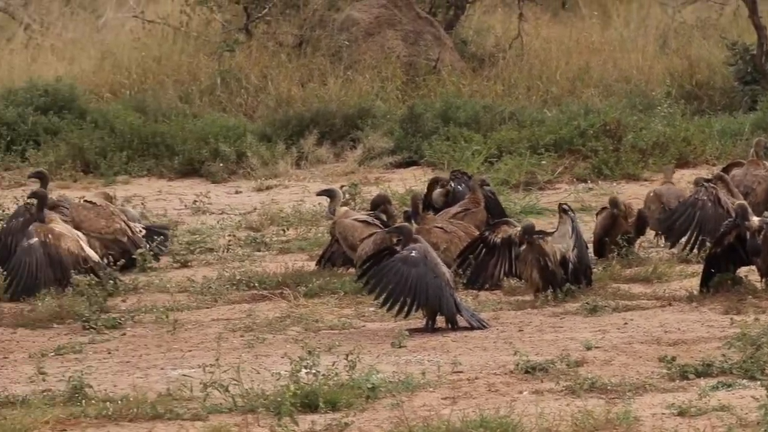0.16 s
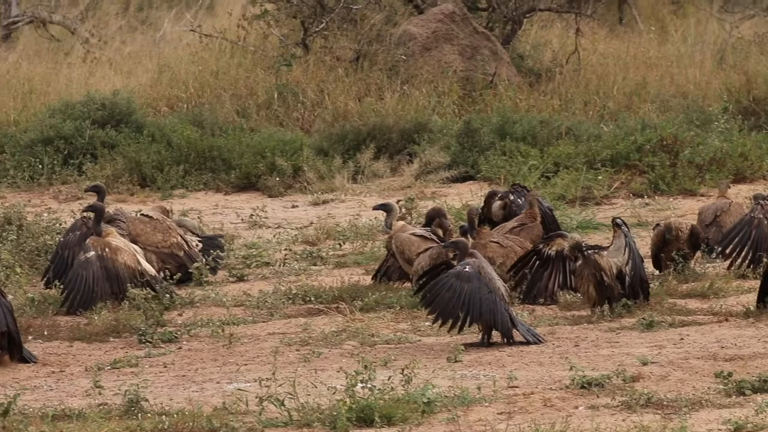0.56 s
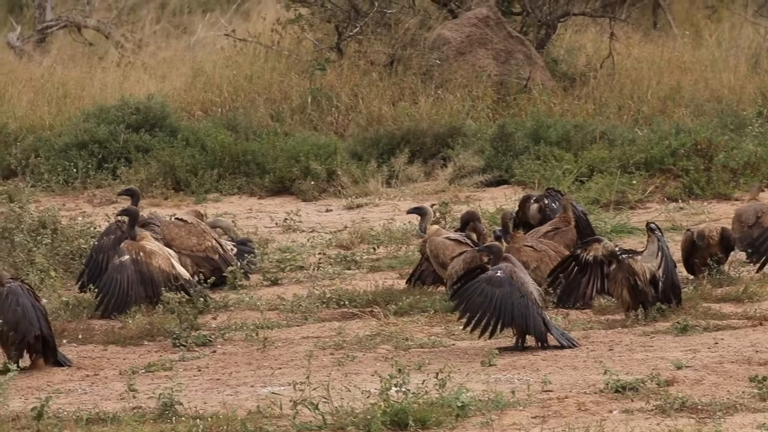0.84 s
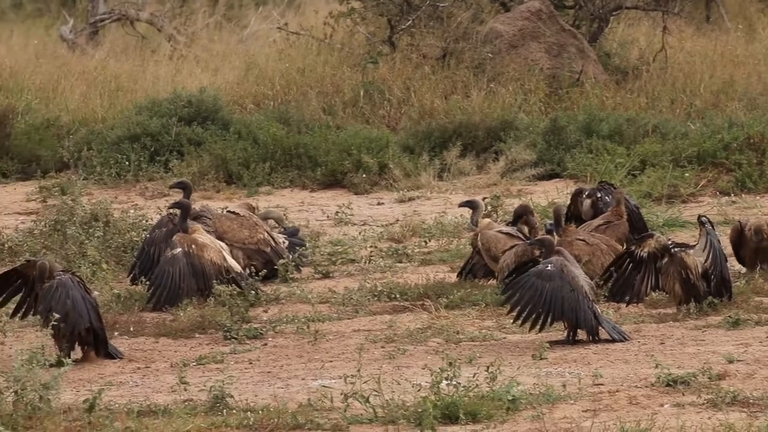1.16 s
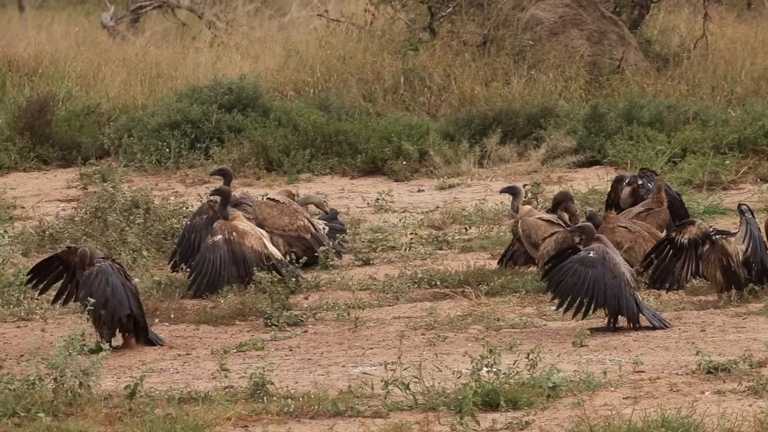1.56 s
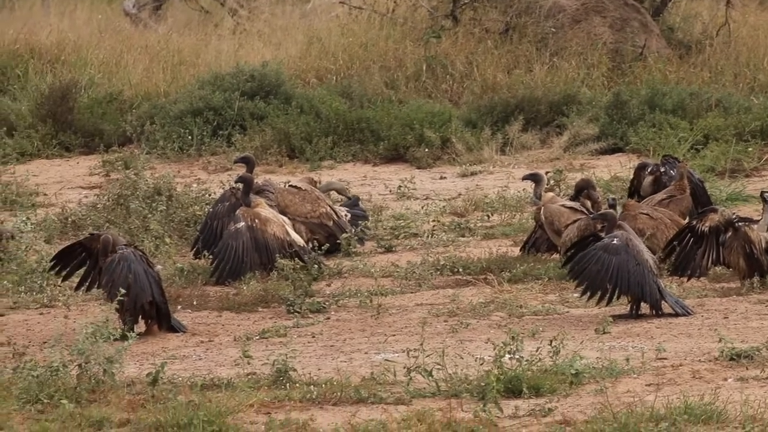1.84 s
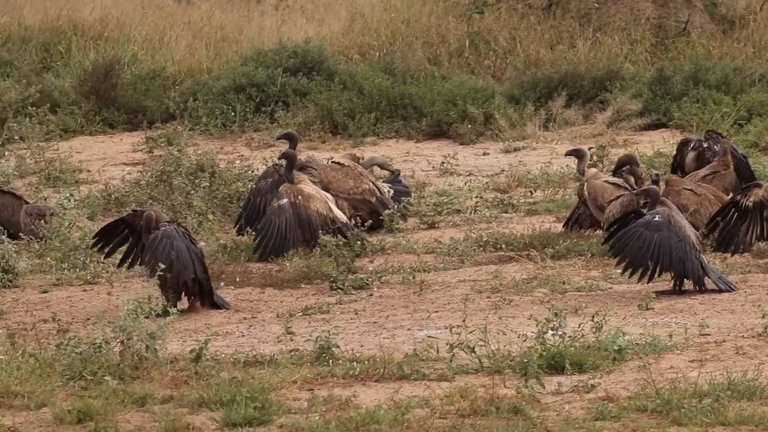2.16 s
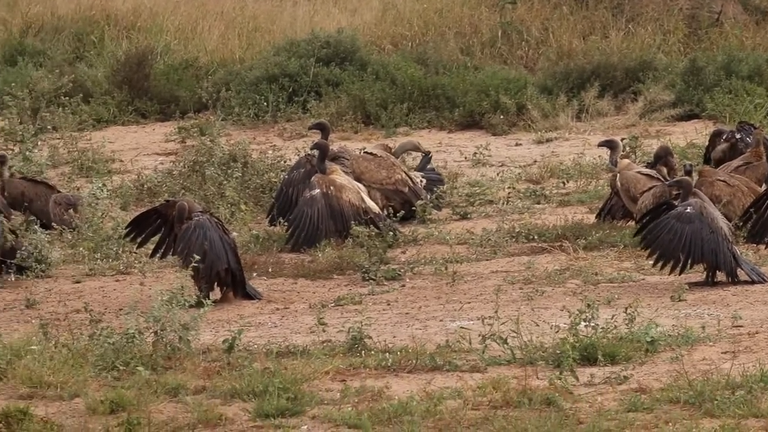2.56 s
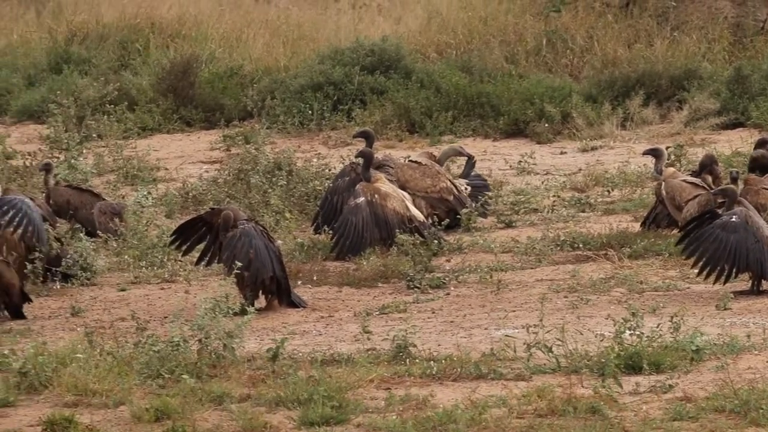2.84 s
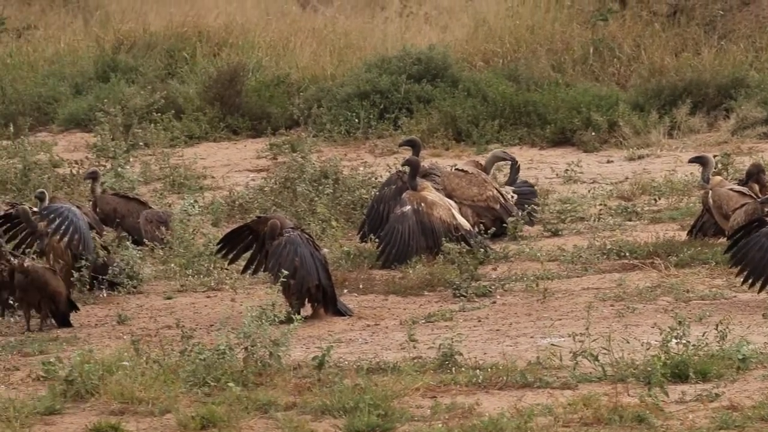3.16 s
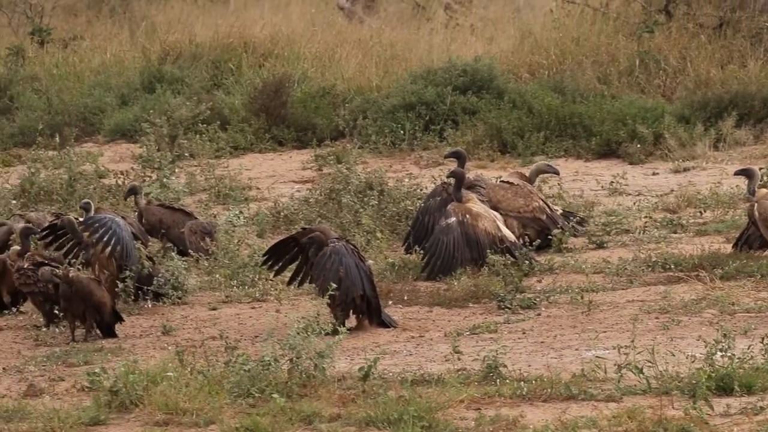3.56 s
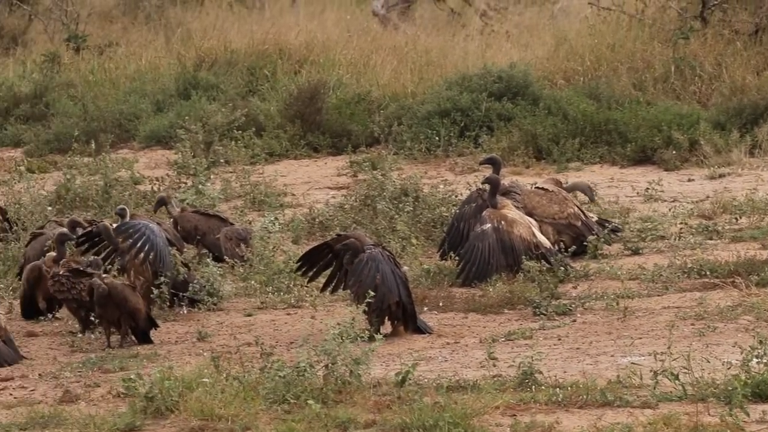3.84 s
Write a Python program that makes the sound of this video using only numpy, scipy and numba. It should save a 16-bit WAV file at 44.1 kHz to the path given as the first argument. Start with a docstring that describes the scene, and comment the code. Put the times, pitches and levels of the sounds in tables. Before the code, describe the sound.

Vultures hiss and rasp breathily on open ground, swelling loudest in the second half.

```python
"""Hissing vultures on open sandy ground

Vultures hiss and rasp a stone's throw away, heard by the two small ports of a hand-held camera.
Breath noise rings two throat resonances and one of the beak; thin whistles and a short squawk sound among
the hisses. Wind buffets the left port, then the right; the camera body clicks once by the left port.
A fly buzzes faintly, soft low thumps and ticks are heard, and a short rising croak comes near the end.
A low drone and soft hiss lie under it all."""
import sys
import numpy as np
from scipy import signal
from scipy.fft import rfft, irfft
from scipy.io import wavfile
from scipy.ndimage import uniform_filter1d
from numba import njit

SR = 44100
rng = np.random.default_rng(int(sys.argv[2]) if len(sys.argv) > 2 else 0)


def to_wav(s):
    """Save 16-bit WAV."""
    ch = np.atleast_2d(s).T  # columns
    pcm = np.round(np.clip(ch, -1, 1) * 32767)  # PCM
    wavfile.write(sys.argv[1], SR, pcm.astype(np.int16))


N = 176400  # samples, 4 s


def undb(db):
    """Decibel law: the amplitude gain of a level in dB."""
    return 10 ** (np.asarray(db) / 20)


def level(x, db):
    """Mean power: scale x to an rms level in dB."""
    return x * undb(db) / np.sqrt(np.mean(x ** 2))


def over_hz(table):
    """Logarithmic frequency scale: spread a (frequency [Hz], value) table over the FFT bins."""
    hz, value = np.array(table, float).T
    bins_hz = np.arange(N // 2 + 1) * SR / N
    return np.interp(np.log(bins_hz + 1), np.log(hz), value)


def coloured(table, x):
    """Spectral shaping: weight x by a table of levels, with nothing beyond its end frequencies."""
    hz = np.arange(N // 2 + 1) * SR / N
    inside = (hz > table[0][0]) * (hz < table[-1][0])
    return irfft(rfft(x) * undb(over_hz(table)) * inside, N)


@njit
def svf(x, hz, width):
    """Driven resonance: a state-variable band-pass whose centre may move, with unit gain at its peak."""
    y, band, low = np.empty(len(x)), 0., 0.
    for i in range(len(x)):
        g, damping = np.tan(np.pi * hz[i] / SR), width / hz[i]
        v = (band + g * (x[i] - low)) / (1 + g * (g + damping))
        band, low = 2 * v - band, low + 2 * g * v
        y[i] = damping * v
    return y


def ring(x, hz, width):
    """Cascaded resonance: two band-passes in series, the second 2.03 times as wide, set to rms 1."""
    return level(svf(svf(x, hz, 1. * width), hz, 2.03 * width), 0)


def walk(rate_hz):
    """Random modulation: levels drawn at about rate_hz and smoothed twice, with spread 1."""
    k = int(SR / rate_hz)
    held = np.repeat(rng.standard_normal(N // k + 1), k)
    w = uniform_filter1d(uniform_filter1d(held, k), k)[:N]
    return w / w.std()


def fade(t, s, length, edge):
    """Trapezoidal envelope: ramp in, hold, ramp out."""
    return np.clip(np.minimum(t - s, s + length - t) / edge, 0, 1)


def panned(x, pan_db):
    """Level difference between ports: weaken the far side; positive pan_db favours the left."""
    return x * undb([[min(pan_db, 0)], [min(-pan_db, 0)]])


# spectrum of the low drone: (frequency [Hz], relative level [dB])
DRONE_SPECTRUM = [(15, -23), (25, -10.5), (49, -5.5), (98, -7.5), (182, -3), (224, -8.5), (285, -1),
                  (375, -7.5), (426, 1.5), (484, -6.5), (646, -6), (689, -10), (783, -9), (876, -12),
                  (1150, -13.5), (1500, -38), (2530, -120)]
# slow rise and fall of the drone: (time [s], gain [dB])
DRONE_SWELL = [(0, -1), (.5, 1), (1.0, -1.1), (1.5, -1), (2.0, -0.8), (2.5, 2), (3.0, -0.2), (3.5, 1.5),
               (4, 0)]
DRONE_DB, DRONE_PAN_DB = -63, 2.5  # rms before swell and pan; left minus right
DRONE_ALIKE = 0.69  # share of power common to both ports


def drone(t):
    """Partial coherence: shaped noise common to both ports mixed with noise independent at each."""
    common, left, right = (coloured(DRONE_SPECTRUM, undb(0.82 * walk(4.37)) * rng.standard_normal(N))
                           for _ in range(3))
    both = np.sqrt(DRONE_ALIKE) * common + np.sqrt(1 - DRONE_ALIKE) * np.array([left, right])
    swell = undb(np.interp(t, *np.array(DRONE_SWELL).T))
    return level(both, DRONE_DB) * swell * undb([[DRONE_PAN_DB / 2], [-DRONE_PAN_DB / 2]])


# spectrum of the microphone hiss: (frequency [Hz], relative level [dB])
MICROPHONE_SPECTRUM = [(530, -38), (900, -12), (968, -3.5), (1840, -9.5), (2620, -25), (2720, -10.5),
                       (4320, -16), (8750, -14), (13900, -18), (16500, -38)]


def microphone_hiss():
    """Incoherent self-noise: shaped noise drawn separately for each port."""
    return level(coloured(MICROPHONE_SPECTRUM, rng.standard_normal((2, N))), -68)


FLY_START_S, FLY_END_S, FLY_HZ, FLY_DB = 0.98, 1.87, 182, -73  # mean pitch, peak level before flutter


def fly(t):
    """Frequency and amplitude modulation: a faint sine wanders in pitch and level, nearer the right port."""
    env = fade(t, FLY_START_S, FLY_END_S - FLY_START_S, 0.088) * undb(4 * walk(12))
    phase = 2 * np.pi * np.cumsum(FLY_HZ * (1 + 0.06 * walk(9))) / SR
    return panned(undb(FLY_DB) * env * np.sin(phase), -1)


# wind puffs on a port: (time [s], push before filtering [dB], length [s], left minus right [dB])
PUFFS = [(2.29, -47.5, 0.021, 16), (2.319, -57, .02, 14), (2.338, -51, .02, 14), (2.368, -47, 0.02, 10),
         (2.38, -29, 0.016, -43), (2.403, -34.5, 0.015, -40), (2.421, -31, 0.014, -36),
         (2.443, -34.5, 0.0063, -40), (2.452, -36, 0.012, -40), (2.461, -50, 0.024, -40)]
PUFF_RISE_S, PUFF_SAG, PUFF_LEAK_DB = 0.0011, 0.34, -26


def wind(t):
    """Pressure pulse: a puff pushes the membrane fast and it swings back; the other port feels it reversed."""
    out = 0
    for s, db, length, pan_db in PUFFS:
        u = np.clip((t - s) / length, 0, 1)
        rise = np.exp(-((t - s) / PUFF_RISE_S) ** 2)
        swing = np.cos(3 * np.pi / 2 * u ** 0.83) * (1 - PUFF_SAG * u)
        out = out + panned(undb(db) * np.where(t < s, rise, swing), pan_db)
    out = signal.sosfilt(signal.butter(1, [12, 400], "band", fs=SR, output="sos"), out)
    return out - undb(PUFF_LEAK_DB) * out[::-1]


# soft low thumps, then a short rising croak in the last two rows:
# (time [s], envelope peak [dB], frequency [Hz], frequency rise [Hz/s], left minus right [dB])
THUMPS_AND_CROAK = [(.06, -61, 50, 0, -16), (.705, -56, 180, 0, -2), (3.041, -57, 160, 0, 2),
                    (3.142, -58, 175, 0, -1), (3.939, -55, 646, 0, 2), (3.944, -56, 770, 4000, 2)]
BURST_CYCLES = 4.5


def thumps_and_croak(t):
    """Tone burst: a few cycles of a sine, steady or rising, under a Gaussian bump."""
    out = 0
    for s, db, hz, rise, pan_db in THUMPS_AND_CROAK:
        spread_s = min(BURST_CYCLES / hz / 2 + 0.0038, .03)
        bump = np.exp(-((t - s) / spread_s) ** 2)
        phase = 2 * np.pi * (hz + rise * (t - s) / 2) * (t - s)
        out = out + panned(undb(db) * bump * np.sin(phase), pan_db)
    return out


# modes of the tapped camera body: (frequency [Hz], relative level [dB], 60 dB decay time [s])
CLICK_MODES = [(400, -26.5, 0.043), (1200, -3, 0.0045), (3800, -2, 0.0025), (5700, 2, 0.0014),
               (7600, 3.5, 0.0013), (9840, -1, 0.0022), (12100, 0, .0016), (15100, -2, .0014)]
CLICK_S, CLICK_RISE_S, CLICK_DB = 2.57633, .00003, -10  # peak level at the left port


def click(t):
    """Modal decay: a sharp tap rings the camera body; the right port hears it thin and late."""
    u = np.maximum(t - CLICK_S, 0)
    x = sum(undb(db) * np.exp(-np.log(1000) * u / t60) * np.sin(2 * np.pi * hz * u)
            for hz, db, t60 in CLICK_MODES)
    x = x * (1 - np.exp(-u / CLICK_RISE_S))
    near = x * undb(CLICK_DB) / np.abs(x).max()
    far = svf(np.roll(near, shift=6), 8500 + 0 * t, 5500.0)  # 6 samples late
    return np.array([near, undb(-10) * far])


# ticks of beaks and grit: (time [s], envelope peak before filter and gain [dB])
TICKS = [(0.4758, -60), (0.581, -61), (0.7297, -57), (0.8405, -59), (1.3543, -61), (1.6546, -61),
         (2.1114, -62), (3.448, -57), (3.9482, -56)]
TICK_HZ, TICK_WIDTH_HZ, TICK_DECAY_S = 3830, 750, 0.0034


def ticks(t):
    """Impulsive excitation: short decaying noise bursts ring one resonance."""
    env = sum(undb(db) * (t > s) * np.exp(-np.abs(t - s) / TICK_DECAY_S) for s, db in TICKS)
    return 5.6 * svf(env * rng.standard_normal(N), TICK_HZ + 0 * t, 1. * TICK_WIDTH_HZ)


# thin whistles and a short squawk (at 1.80 s) among the hisses: (start [s], length [s],
# start frequency [Hz], end frequency [Hz], rms level before flutter [dB], octave relative to fundamental [dB])
WHISTLES_AND_SQUAWK = [(1.172, .105, 2390, 2290, -66, -26), (1.738, 0.033, 1420, 1380, -64, -14),
                       (1.801, 0.027, 1370, 1354, -57, 0), (1.852, .072, 2095, 2135, -68.5, -4),
                       (1.917, .066, 2135, 2120, -69, -8), (1.975, .058, 2490, 2600, -80, -24),
                       (2.026, 0.044, 2610, 2540, -75, -20), (2.062, 0.03, 2520, 2300, -67.5, -17),
                       (2.086, 0.055, 2130, 2120, -67, -20)]
WHISTLE_EDGE_S, WHISTLE_WAVER, WHISTLE_FLUTTER_DB = .008, .005, 2.2  # waver: fraction of pitch


def whistles_and_squawk(t):
    """Harmonic tone: a gliding, wavering sine with its octave, as strong as the fundamental in the squawk."""
    out = 0
    waver = 1 + WHISTLE_WAVER * walk(90)
    flutter = undb(WHISTLE_FLUTTER_DB * walk(70))
    for s, length, hz0, hz1, db, octave_db in WHISTLES_AND_SQUAWK:
        env = fade(t, s, length, WHISTLE_EDGE_S)
        phase = 2 * np.pi * np.cumsum(np.interp(t, [s, s + length], [hz0, hz1]) * waver) / SR
        tone = np.sin(phase) + undb(octave_db) * np.sin(2 * phase)
        out = out + undb(db) * env * flutter * tone
    return out * np.sqrt(2)  # rms to peak of a sine


# short rough rasps: (start [s], length [s], level before envelope [dB], centre [Hz], width [Hz])
RASPS = [(0.048, 0.079, -62, 1000, 604), (1.803, 0.034, -55, 2800, 3460), (1.884, 0.016, -64, 2300, 2000)]
RASP_RATE_HZ, RASP_DEPTH_DB, RASP_ATTACK_S = 300, 6, .003


def rasps(t):
    """Amplitude roughness: resonant noise with fast random level changes starts sharply, then sags."""
    rough = undb(RASP_DEPTH_DB * walk(RASP_RATE_HZ)) * rng.standard_normal(N)
    out = 0
    for s, length, db, hz, width in RASPS:
        attack = np.clip((t - s) / RASP_ATTACK_S, 0, 1)
        sag = np.clip((s + length - t) / length * 2.3, 0, 1)
        out = out + undb(db) * attack * sag * ring(rough, hz + 0 * t, width)
    return out


# half-whistled strands of breath:
# (start [s], length [s], start frequency [Hz], end frequency [Hz], level [dB])
STRANDS = [(0.026, 0.26, 1470, 1450, -55), (0.08, 0.2, 2180, 2110, -53.5), (1.8, 0.043, 2670, 3200, -59),
           (1.711, 0.064, 3000, 2850, -61), (1.704, 0.06, 2420, 2400, -58), (1.76, .08, 2230, 2300, -63),
           (2.13, 0.08, 4050, 3430, -63), (2.577, 0.136, 2370, 1566, -45), (2.671, 0.296, 1540, 1458, -50),
           (2.71, 0.1, 1980, 1830, -49.5), (2.6, 0.063, 1720, 1630, -46), (2.81, .035, 2230, 2330, -50),
           (2.99, 0.079, 1450, 1570, -53), (2.682, 0.052, 4820, 5070, -56), (3.55, 0.36, 2080, 2300, -62)]
STRAND_WIDTH_HZ, STRAND_EDGE_S = 128, 0.018


def strands(t):
    """Narrow-band noise: breath noise through one narrow gliding resonance."""
    breath = rng.standard_normal(N)
    out = 0
    for s, length, hz0, hz1, db in STRANDS:
        glide_hz = np.interp(t, [s, s + length], [hz0, hz1])
        env = fade(t, s, length, STRAND_EDGE_S)
        out = out + undb(db) * env * ring(breath, glide_hz, STRAND_WIDTH_HZ)
    return out


# one path of levels and resonances per hiss: (time [s], low throat level [dB], low throat [Hz],
# high throat level [dB], high throat [Hz], beak level [dB], beak [Hz], treble level [dB], top air level [dB])
HISSES = [
    [(0.0, -49, 1550, -54, 2340, -60, 3730, -69, -80), (0.036, -59, 1540, -54, 2200, -58.5, 3870, -66, -75),
     (0.086, -47, 1470, -48.5, 2020, -61, 3930, -62.5, -84),
     (0.122, -57, 1480, -50, 2160, -62, 4100, -59, -72),
     (0.204, -55, 1700, -47, 2110, -56.5, 3980, -58, -61),
     (0.324, -53, 1550, -52, 2270, -56.5, 3920, -64.5, -69),
     (0.392, -52.5, 1640, -50.5, 2220, -60, 3600, -61, -78),
     (0.458, -54.5, 1610, -55, 2170, -64.5, 3570, -75, -88),
     (0.564, -56, 1660, -55.5, 2130, -67.5, 3850, -69, -88),
     (0.62, -53, 1670, -57, 2040, -62, 3600, -67, -84)],
    [(0.62, -58, 1680, -61, 2110, -65, 3660, -68, -80),
     (0.682, -54.5, 1700, -58.5, 1960, -63, 3660, -76.5, -82),
     (1.046, -57, 1750, -57.5, 1920, -73, 3540, -74, -86),
     (1.086, -59.5, 1690, -66.5, 1950, -74, 3730, -80, -88),
     (1.236, -60, 1640, -62.5, 2200, -72.5, 3620, -72, -77),
     (1.368, -61, 1760, -66, 1940, -75.5, 3800, -84, -99),
     (1.584, -60, 1680, -64, 2370, -70.5, 3690, -78, -80),
     (1.624, -61, 1690, -69, 2080, -74, 3860, -84, -91),
     (1.638, -64, 1690, -57.5, 2130, -67.5, 3860, -73, -87),
     (1.69, -60, 1650, -64, 2070, -73, 3770, -82, -89)],
    [(1.69, -72, 1610, -78, 2310, -80, 3640, -87, -91), (1.702, -65, 1610, -72, 2360, -87, 3550, -89, -91),
     (1.726, -59, 1590, -52, 2430, -80, 3490, -67, -84), (1.756, -60, 1470, -58, 2420, -60, 3500, -68, -89),
     (1.788, -62, 1460, -66, 2270, -88, 3720, -78, -88), (1.818, -62, 1400, -53, 2540, -56, 3890, -76, -87),
     (1.858, -69, 1490, -82, 2420, -84, 4000, -88, -93), (1.886, -63, 1460, -63, 2100, -72, 4220, -88, -89),
     (1.904, -82, 1540, -67, 2120, -72, 4060, -84, -86), (2.0, -75, 1490, -74, 2200, -80, 3800, -89, -93)],
    [(2.1, -96, 1610, -86, 2100, -84, 3920, -88, -94), (2.156, -50, 1610, -52.5, 2020, -70, 3960, -67, -84),
     (2.174, -51, 1640, -60, 1950, -55.5, 3720, -64, -85),
     (2.226, -47, 1680, -46, 1990, -58, 3670, -64, -75),
     (2.288, -44, 1700, -48, 2070, -49, 3500, -57.5, -73),
     (2.352, -44, 1730, -45.5, 2150, -54, 3730, -61, -79),
     (2.386, -50.5, 1650, -56, 2030, -77, 3650, -64, -85),
     (2.416, -43, 1750, -48.5, 2010, -60, 3950, -59, -75),
     (2.526, -48, 1650, -50.5, 1940, -59, 3680, -58.5, -72),
     (2.56, -50, 1590, -51, 2210, -51, 3870, -57, -71)],
    [(2.59, -49, 1550, -42, 2270, -48.5, 3600, -62, -84),
     (2.628, -52, 1670, -44.5, 2100, -58, 3930, -58, -77),
     (2.664, -45, 1700, -50, 2120, -50, 3840, -64, -77),
     (2.756, -48, 1550, -48, 2210, -62.5, 3920, -64.5, -81),
     (2.808, -47, 1650, -51.5, 2330, -57, 3700, -67, -85),
     (2.888, -46, 1690, -47.5, 2220, -59.5, 3740, -62, -81),
     (3.08, -51, 1550, -46, 2170, -55, 4060, -61, -75),
     (3.162, -55.5, 1530, -49.5, 2280, -58, 3960, -67.5, -85),
     (3.322, -59, 1830, -61.5, 2030, -79, 3630, -73.5, -89),
     (3.35, -63, 1720, -59, 2150, -87, 3760, -88, -91)],
    [(3.35, -60, 1710, -64, 2050, -86, 3860, -86, -87),
     (3.406, -60, 1720, -59.5, 2100, -75, 4080, -68, -86),
     (3.432, -57, 1700, -63, 2210, -88, 3770, -82, -75),
     (3.442, -61, 1600, -62, 2200, -79, 3770, -64.5, -75),
     (3.49, -60, 1570, -52, 2180, -79, 3580, -66.5, -91),
     (3.518, -53, 1650, -57.5, 2170, -67, 3620, -59.5, -79),
     (3.652, -52, 1650, -49.5, 2320, -60.5, 3400, -60.5, -77),
     (3.756, -59, 1650, -53, 2280, -80, 3400, -70.5, -88),
     (3.942, -60.5, 1570, -56, 2240, -81, 3780, -69, -79), (4.0, -64, 1570, -69, 2190, -68, 3800, -78, -89)],
]
# spectrum of the treble breath: (frequency [Hz], relative level [dB])
TREBLE_SPECTRUM = [(2600, -52), (3800, -9), (4700, -11), (5500, -3.5), (6200, -4), (7200, -4.5), (8100, -4),
                   (8800, -33), (10000, -26), (12000, -53)]
LOW_WIDTH_HZ, HIGH_WIDTH_HZ, BEAK_WIDTH_HZ = 550, 605, 1010
THROAT_EDGE_HZ, AIR_HZ, AIR_WIDTH_HZ = 1328, 10400, 2200
FLUTTER_HZ, FLUTTER_DB, WOBBLE_HZ, WOBBLE_DB = 151.2, 1, 15, 0.96


def hisses(t):
    """Source and filter: fluttering breath noise excites moving throat and beak resonances, treble and air."""
    rows = np.vstack([np.array(h, float) for h in HISSES])
    paths = (np.interp(t, rows[:, 0], column) for column in rows.T[1:])
    low_db, low_hz, high_db, high_hz, beak_db, beak_hz, treble_db, air_db = paths
    flutter = undb(FLUTTER_DB * walk(FLUTTER_HZ))  # shared by every band

    def breath():
        """Turbulence: noise with the shared flutter and a wobble of its own."""
        return flutter * undb(WOBBLE_DB * walk(WOBBLE_HZ)) * rng.standard_normal(N)

    low = undb(low_db) * ring(breath(), low_hz, LOW_WIDTH_HZ)
    high = undb(high_db) * ring(breath(), high_hz, HIGH_WIDTH_HZ)
    throat_edge = signal.butter(10, THROAT_EDGE_HZ, "high", fs=SR, output="sos")
    throat = signal.sosfilt(throat_edge, low + high)
    beak = undb(beak_db) * ring(breath(), beak_hz, BEAK_WIDTH_HZ)
    treble = undb(treble_db) * level(coloured(TREBLE_SPECTRUM, breath()), 0)
    air = undb(air_db) * ring(breath(), AIR_HZ + 0 * t, AIR_WIDTH_HZ)
    return throat + beak + treble + air


# level difference of the ports: (frequency [Hz], left minus right [dB])
PORT_BALANCE = [(60, 3.0), (110, 2.5), (200, 2.5), (380, 4.0), (700, -8), (1290, -3.5), (2380, 1),
                (4400, 5), (8120, 3), (15000, 23.5)]
# phase lag of the right port: (frequency [Hz], lag [rad])
PORT_LAG = [(200, .2), (1000, 0.69), (2000, 1.05), (2700, 1.3), (3600, 1.89), (5000, 1.12), (8500, 2.78),
            (16000, 2.8)]
# ground scatter: (frequency [Hz], scatter over direct sound [dB])
SCATTER = [(1000, -11), (2000, -9), (3500, -5), (8000, -1), (10000, 6)]
SCATTER_T60_S, SCATTER_DRIFT_HZ = .2, 1.5


def ports(x, t):
    """Interaural-type cues: direct sound meets the ports with lag and tilt, ground scatter differs and drifts."""
    tails = rng.standard_normal((2, 2, N)) * np.exp(-np.log(1000) * t / SCATTER_T60_S)
    tails = tails / np.sqrt(np.sum(tails ** 2, axis=2, keepdims=True))
    # half the difference goes to each port, in opposite senses
    half = undb(over_hz(PORT_BALANCE) / 2) * np.exp(.5j * over_hz(PORT_LAG))
    wet = undb(over_hz(SCATTER))
    # the scatter turns steadily between two pairs of tails
    turn = 2 * np.pi * SCATTER_DRIFT_HZ * t
    scatter = rfft(x * np.cos(turn)) * rfft(tails[0]) + rfft(x * np.sin(turn)) * rfft(tails[1])
    mixed = (rfft(x) + wet * scatter) / np.sqrt(1 + wet ** 2)
    return irfft(mixed * np.array([half, 1 / half]), N)


def scene():
    """Superposition: sounds added straight to each port join the birds heard through the ports."""
    t = np.arange(N) / SR
    background = drone(t) + microphone_hiss() + fly(t)
    added_at_ports = wind(t) + thumps_and_croak(t) + click(t)
    birds = ticks(t) + whistles_and_squawk(t) + rasps(t) + strands(t) + hisses(t)
    return background + added_at_ports + ports(birds, t)


def record(dry):
    """Band limiting: a steep elliptic low-pass cuts the top above 16.6 kHz."""
    return signal.sosfilt(signal.ellip(10, .2, 80, 16600, fs=SR, output="sos"), dry)


dry = scene()
out = record(dry)
to_wav(out)
```